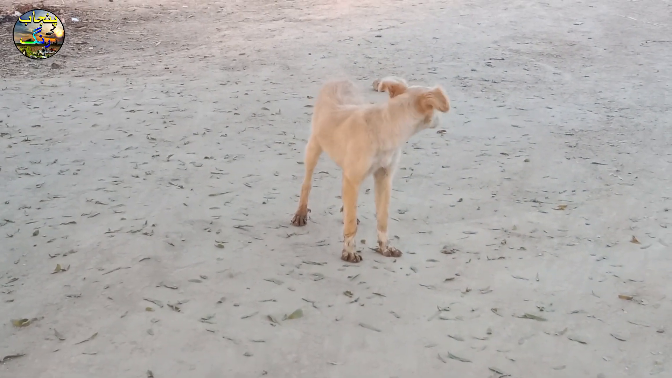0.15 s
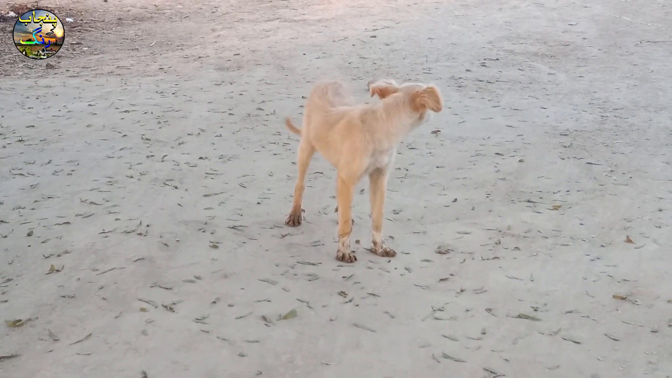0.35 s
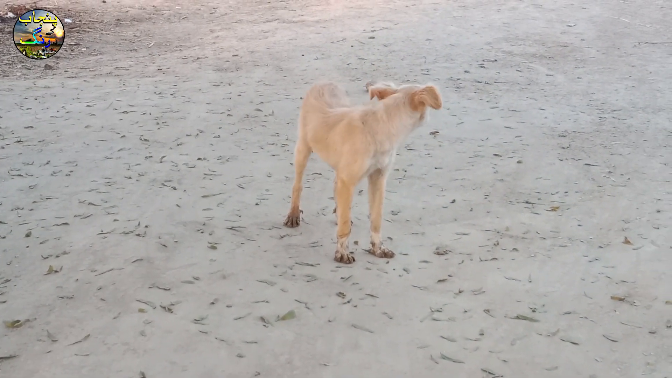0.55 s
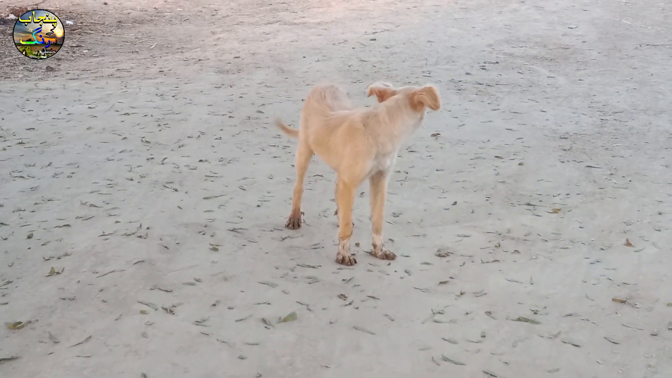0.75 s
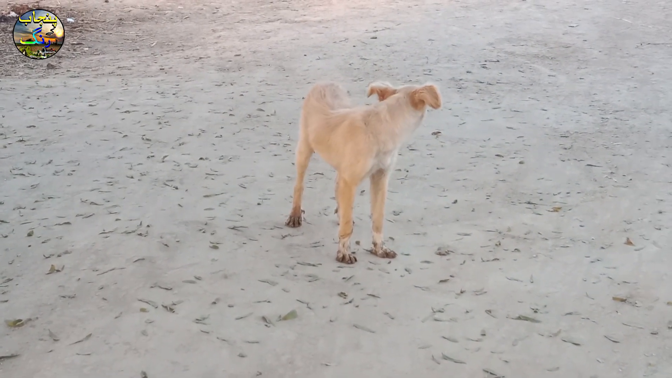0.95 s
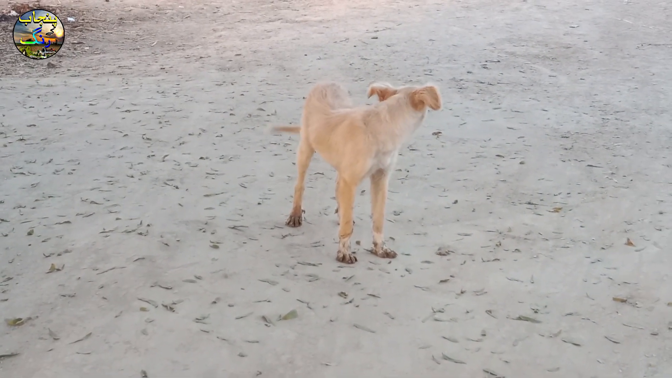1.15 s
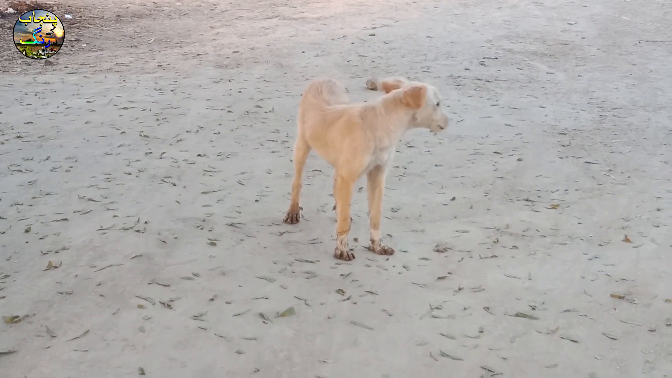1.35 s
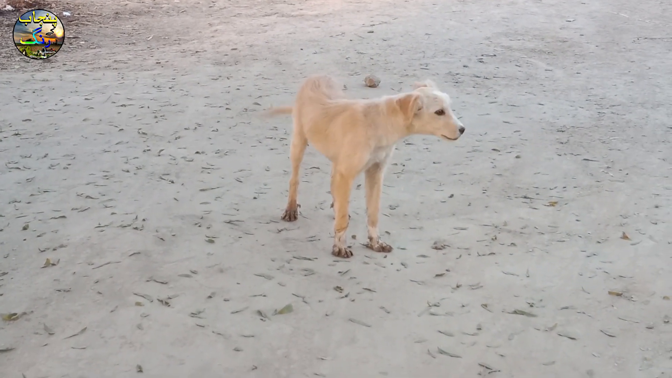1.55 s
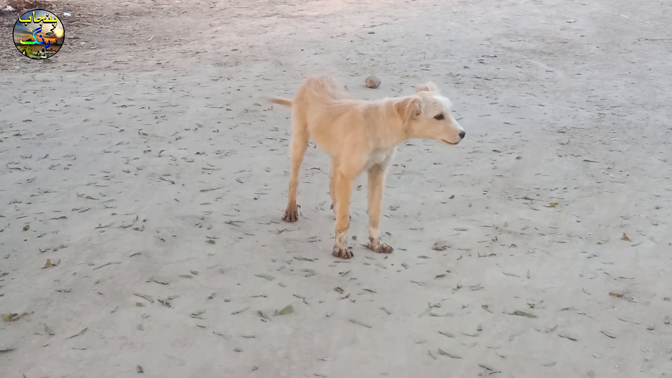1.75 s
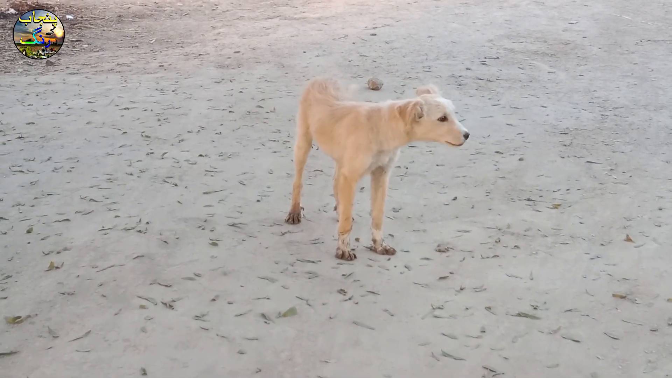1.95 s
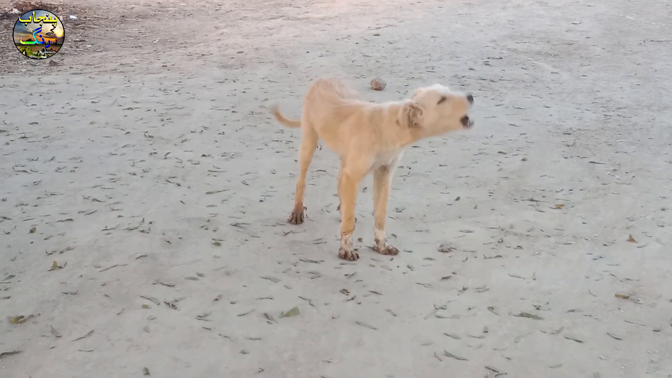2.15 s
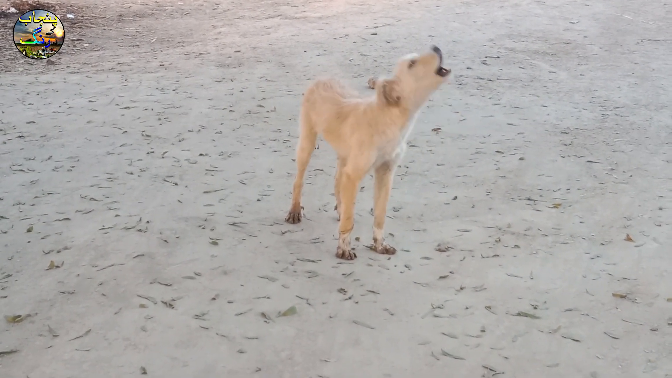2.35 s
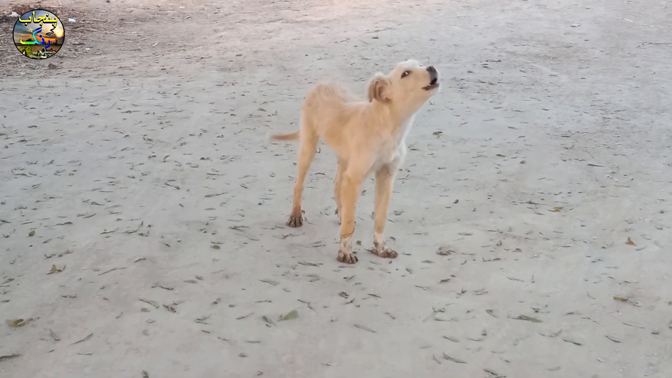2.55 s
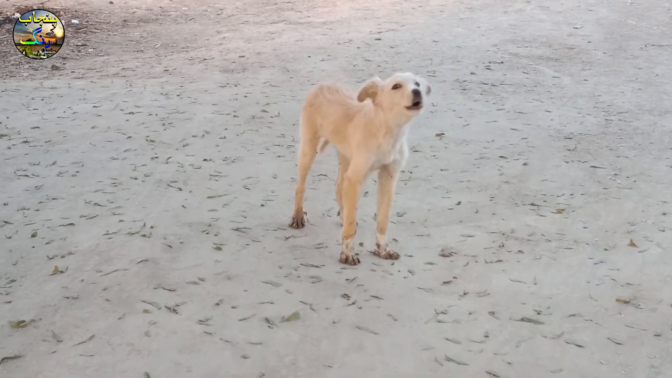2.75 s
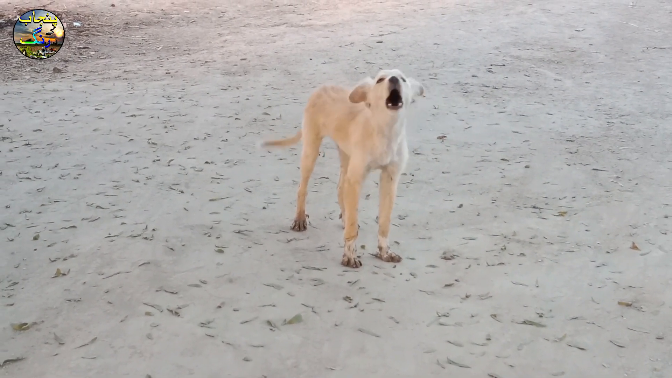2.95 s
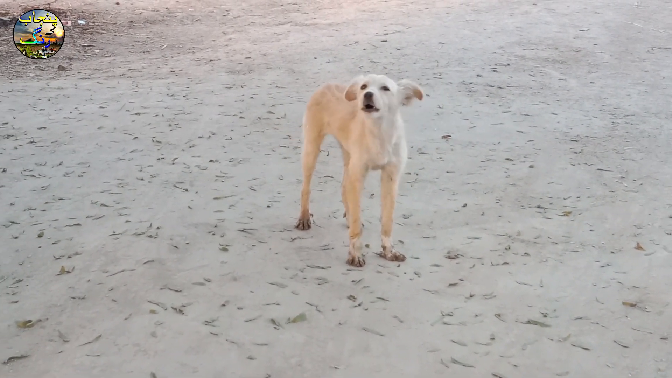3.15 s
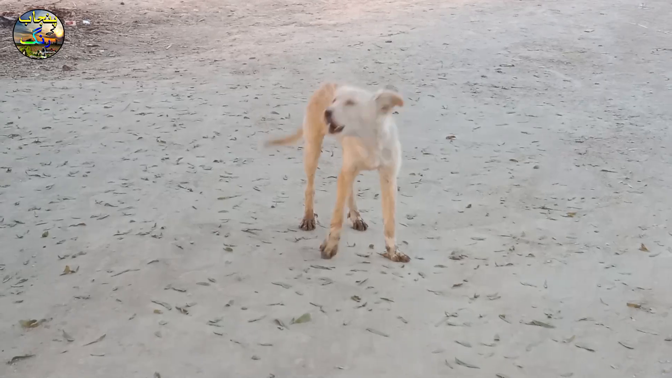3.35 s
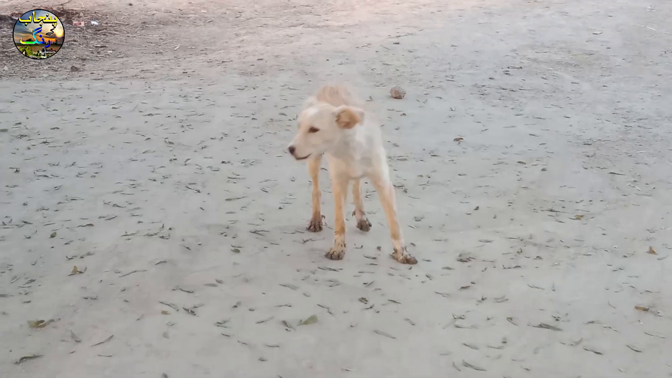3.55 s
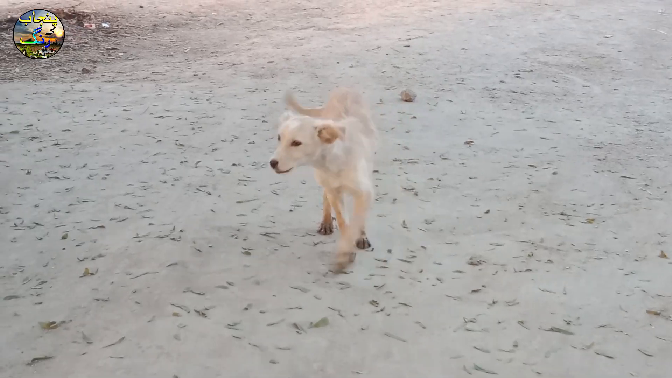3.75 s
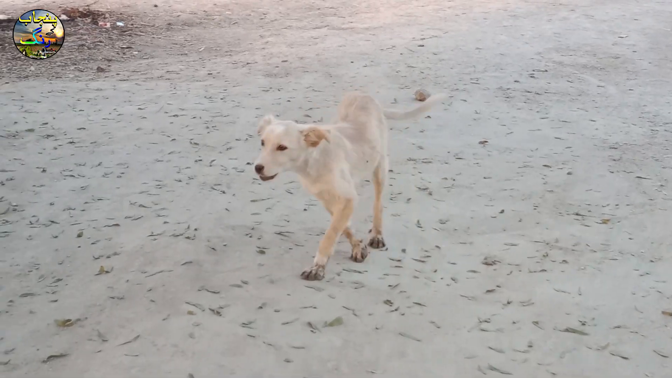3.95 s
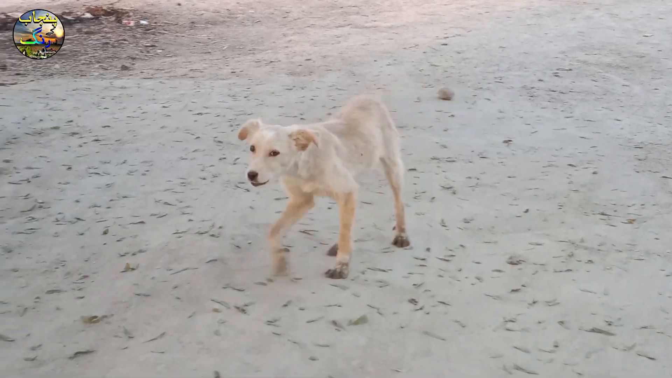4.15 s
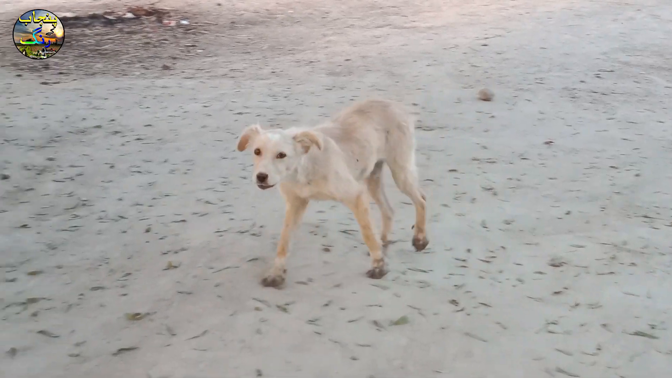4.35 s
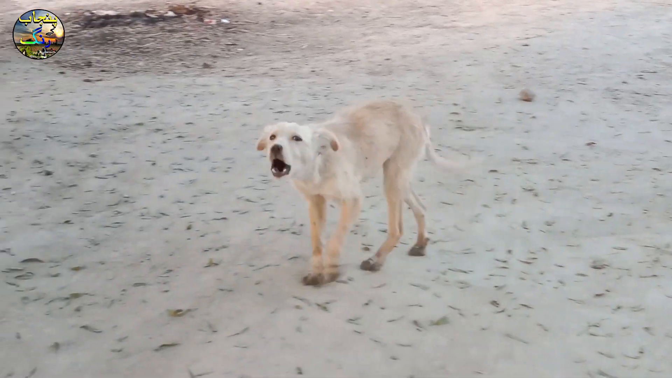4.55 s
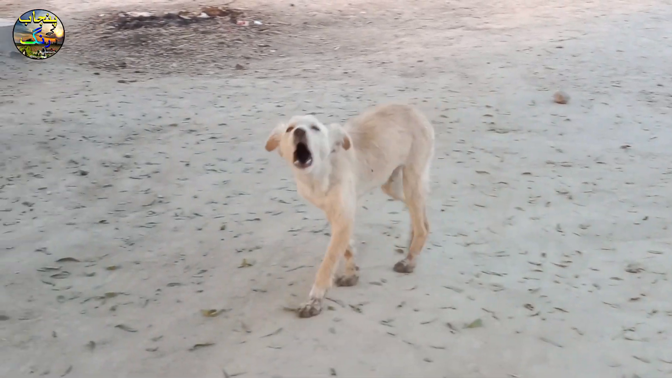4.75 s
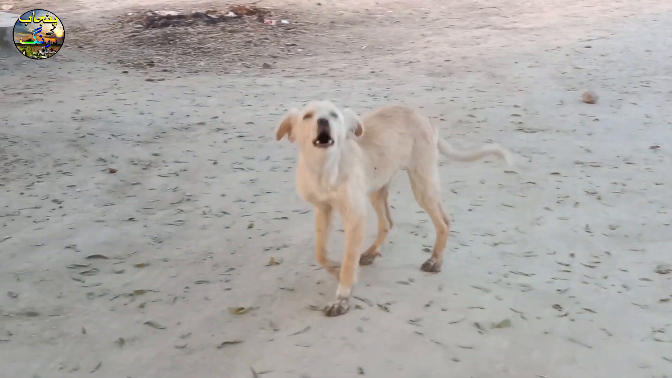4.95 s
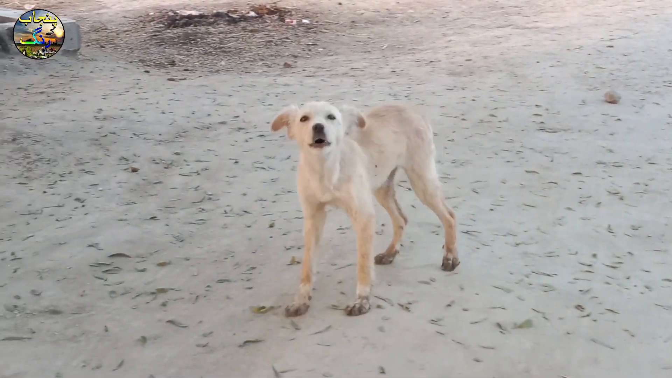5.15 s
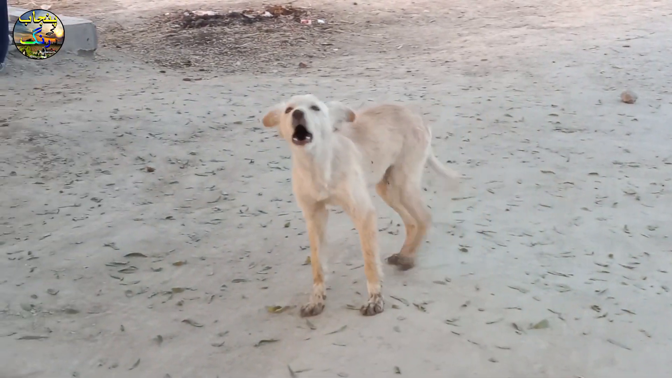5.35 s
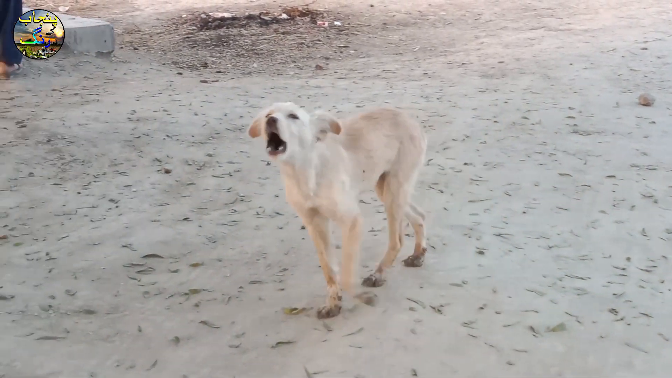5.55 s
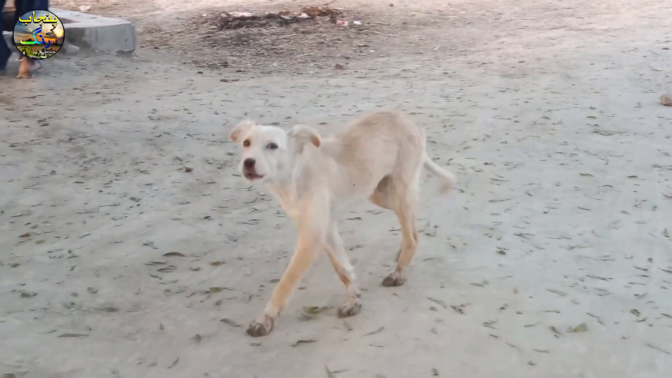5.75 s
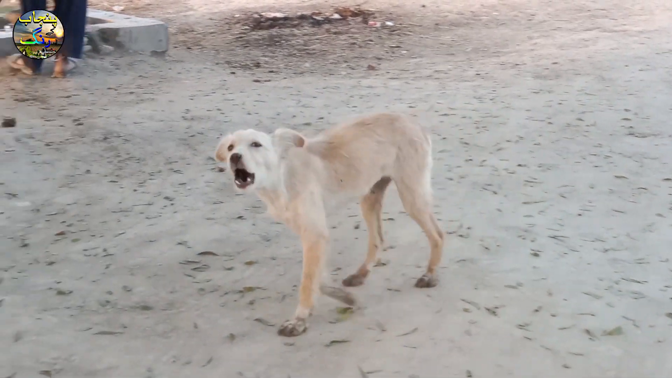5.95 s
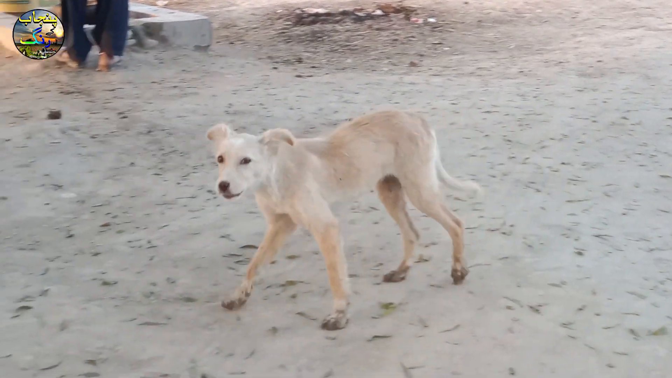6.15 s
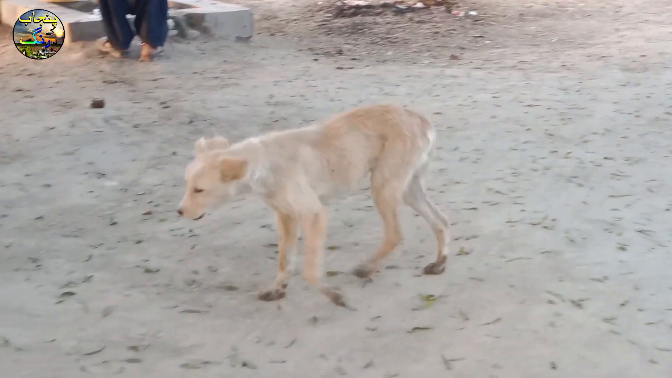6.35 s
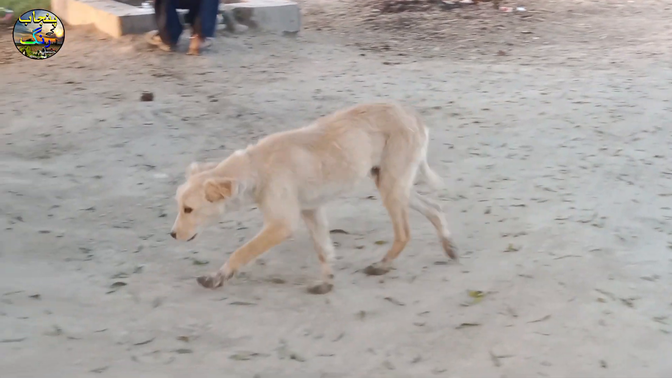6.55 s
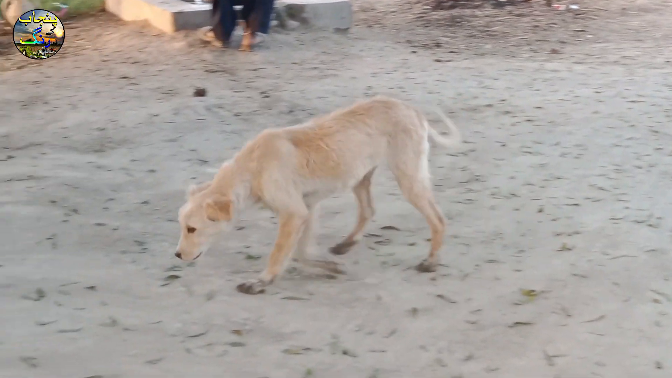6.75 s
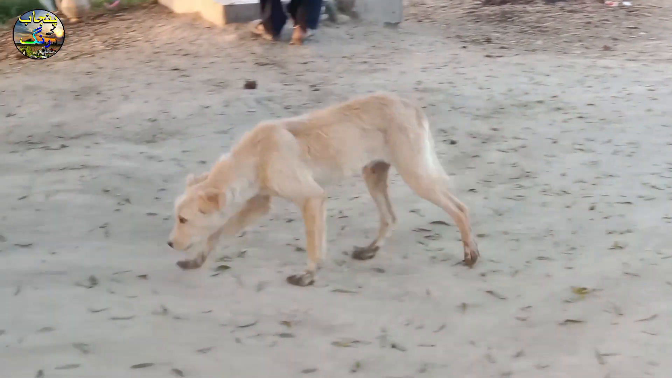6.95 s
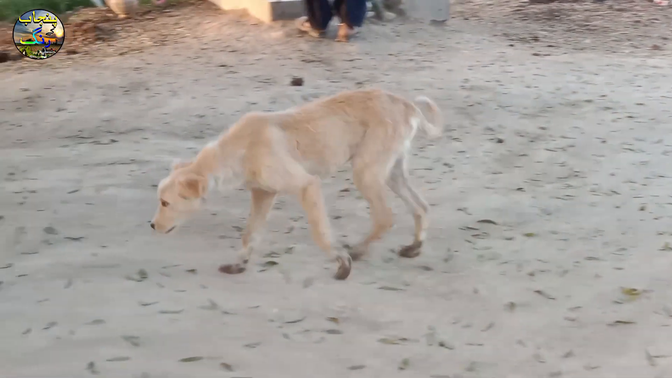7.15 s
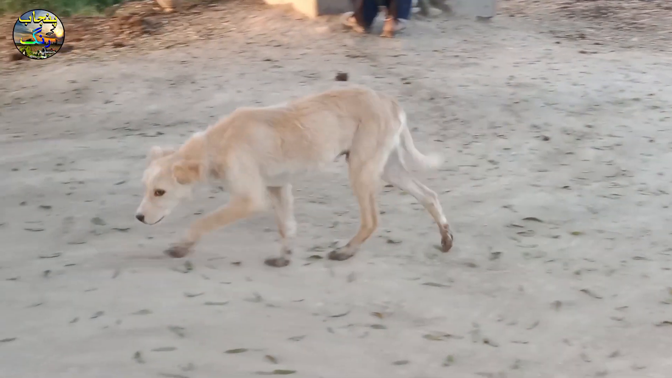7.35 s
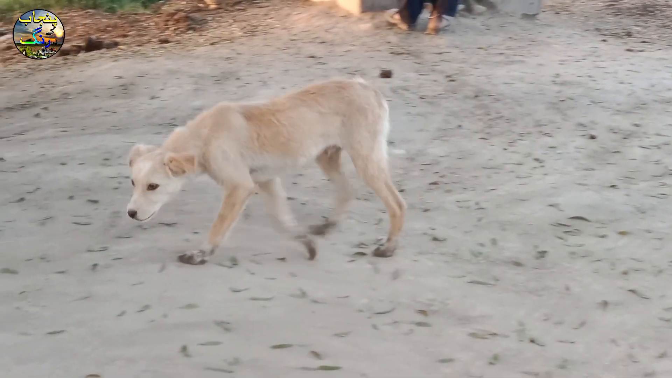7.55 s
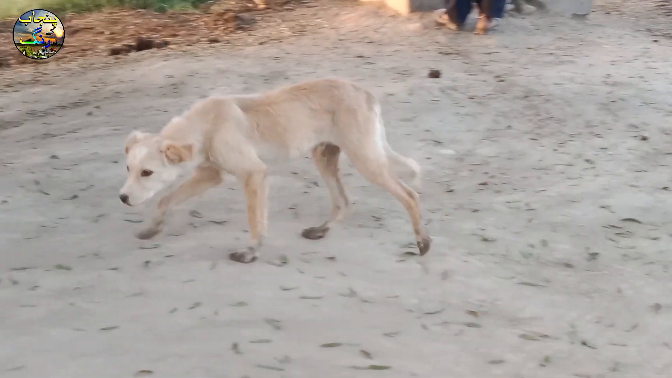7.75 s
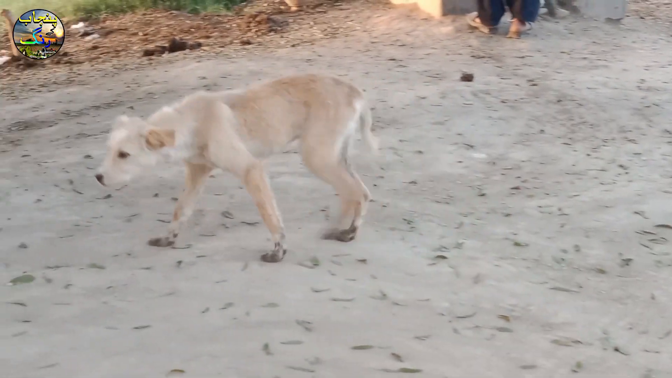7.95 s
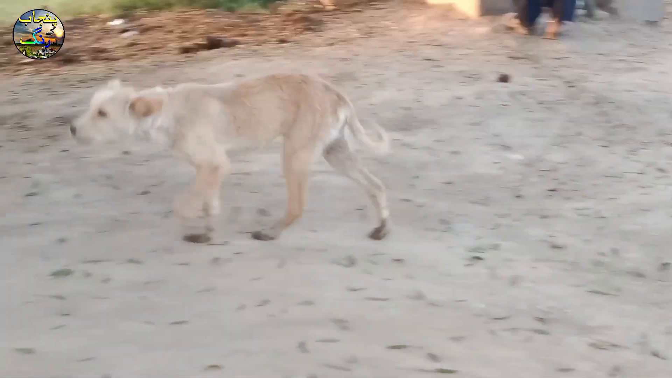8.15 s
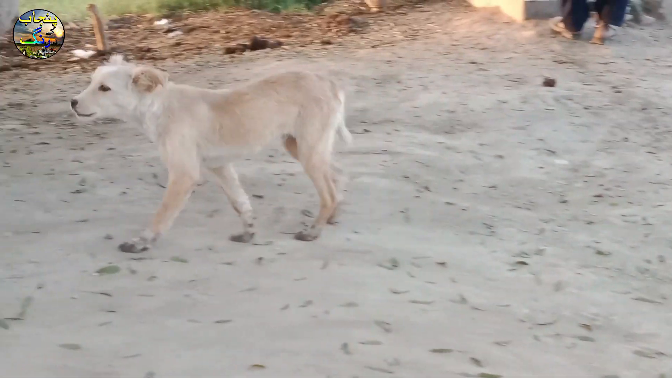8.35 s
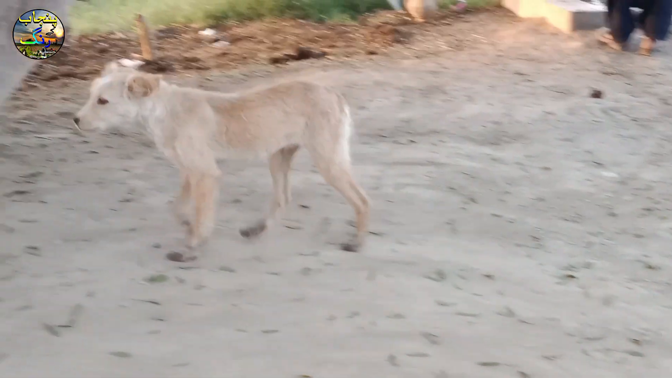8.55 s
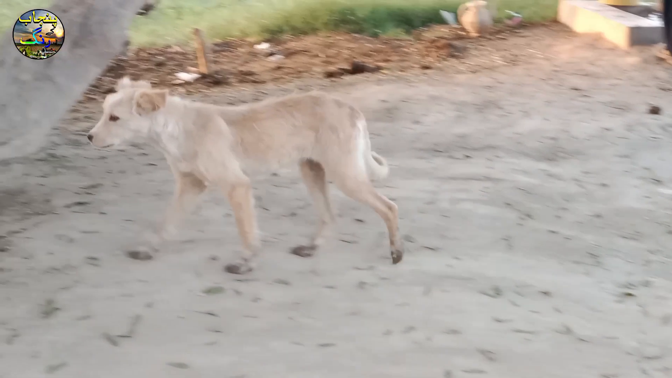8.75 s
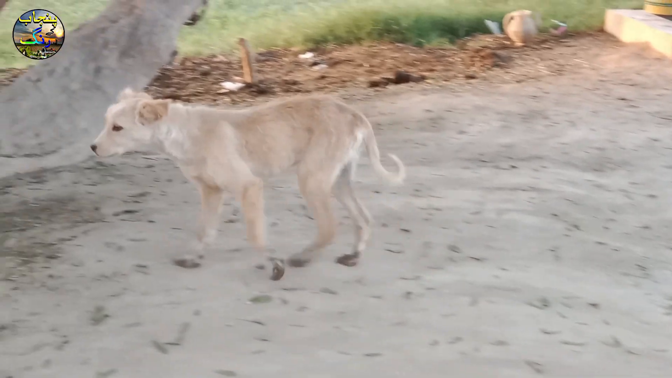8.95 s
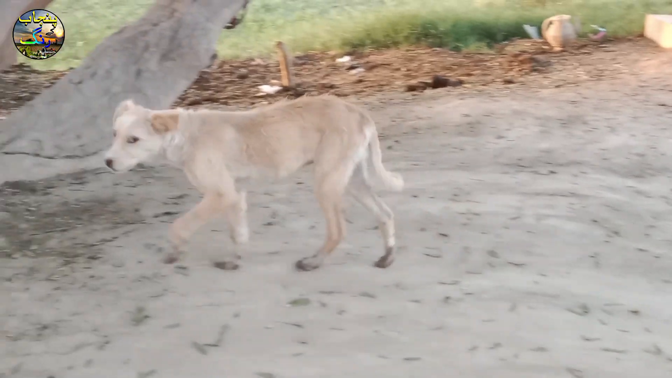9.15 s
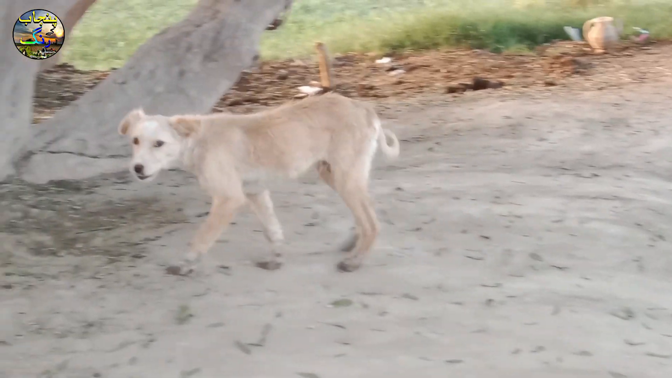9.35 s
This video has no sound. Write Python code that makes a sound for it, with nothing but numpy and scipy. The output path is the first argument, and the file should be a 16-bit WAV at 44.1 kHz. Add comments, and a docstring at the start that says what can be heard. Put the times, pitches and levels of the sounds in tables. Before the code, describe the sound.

In a quiet, open yard, sparrows chirp faintly from start to end, and another bird gives a few clear whistles around 1 second. At 2 seconds a young dog, close and loud, yelps five times in a quick, connected run lasting until about 3.4 seconds. Each bark starts as a rough rumble, leaps to a clean, high, howl-like note and drops back into a snarl. After a short pause, six more barks follow from 4.4 to 6 seconds, ending in a brief, quiet growl. From 6 seconds paws scuff lightly on dry dirt now and then, and the other bird whistles twice around 7 seconds. A longer, soft, low growl runs from about 7.9 to 8.6 seconds. A few faint scuffs and dull footfalls come just after 9 seconds as the sparrows carry on. There is only a slight outdoor echo.

```python
"""In an open dirt yard, sparrows chirp with both sides of their voice box and another bird whistles.
At 2 s a young dog yelps five times, and from 4.4 s six more. In each bark its vocal folds flap in a
rough rumble, tighten into a clean high note and drop back. From 6 s feet scuff and thud on the dirt
now and then, and slow pulses in the dog's throat make a short growl, then a longer one near 8 s.
The sparrows chirp on to the end."""
import sys
import numpy as np
from scipy import signal
from scipy.fft import rfft, irfft, next_fast_len
from scipy.io import wavfile
from scipy.ndimage import uniform_filter1d, minimum_filter1d

SR = 44100
rng = np.random.default_rng(int(sys.argv[2]) if len(sys.argv) > 2 else 0)


def master(y):
    """Save y as 16-bit WAV."""
    cut = np.clip(np.atleast_2d(y).T, -1, 1)
    pcm = np.round(cut * 32767)  # scale
    wavfile.write(sys.argv[1], SR, pcm.astype(np.int16))


N = 413638
TIME = np.arange(N) / SR

# runs of barks, with no pause in the voice (start [s], end [s])
BARK_BOUTS = [(2.008, 3.4), (4.383, 6.02)]
# each bark and its high note (note start [s], note length [s], first pitch [Hz], last pitch [Hz],
# run-up [s], fall [s], level before the leap [dB], at note start [dB], at note end [dB],
# after the drop [dB], overtones [dB], treble [dB], hoarseness [0-1])
BARK_NOTES = [(2.086, .06, 1131, 1116, .13, 0.12, -20, -27.5, -19.5, -17, -14, -37, 0),
              (2.326, 0.07, 887.6, 925, 0.11, .16, -13.5, -11.5, -9.5, -18, -25, -43.5, 0.01),
              (2.582, 0.049, 936, 990.5, 0.11, 0.15, -10.5, -12, -13, -17.5, -21, -38.5, 0.05),
              (2.865, 0.044, 977, 1002, 0.096, 0.14, -10.5, -12.5, -13, -16, -17, -35, 0.04),
              (3.19, 0.056, 888.4, 1192, 0.12, 0.096, -11, -20.5, -18, -17, -14.5, -35, 0.18),
              (4.45, 0.073, 1092, 1054, 0.099, 0.12, -17, -21.5, -9, -16.5, -14.5, -31, 0),
              (4.693, 0.085, 882.7, 924.3, 0.13, 0.17, -14, -11.5, -9.5, -19, -25.5, -39, 0.05),
              (4.964, .05, 916, 925.3, 0.094, .16, -8, -14, -7.5, -16.5, -24, -38, .05),
              (5.239, 0.051, 944.4, 1004, 0.081, 0.13, -8.5, -16, -16, -12.5, -17, -34, 0.15),
              (5.507, 0.045, 922, 984.5, 0.1, 0.094, -8, -12.5, -12, -12, -15.5, -33.5, 0.2),
              (5.831, .051, 900, 1240, 0.094, 0.096, -9.5, -17.5, -24.5, -14.5, -14, -38.5, 0.01)]
# the harsh burst in a bout's first bark (middle [s], width [s], level [dB])
OPENING_BURSTS = [(2.062, 0.01, -20.5), (4.429, .011, -10)]
# how the throat and mouth shape a bark (frequency [Hz], gain [dB])
BARK_THROAT = [(280, -35), (420, -19.5), (630, 17), (790, 7), (980, 5), (1160, -2.5), (1340, -1),
               (1540, -18.5), (1820, -7), (2500, -27.5), (3000, -20.5), (3700, -33.5), (5000, -40.5),
               (6350, -28.5), (6800, -31.5), (7600, -22), (9200, -50), (15000, -49.5)]
# how much the voice breaks up (pitch [Hz], roughness [0-1])
ROUGHNESS_BY_PITCH = [(380, 0.8), (660, 0.7), (820, 0.4), (920, 0)]
# where the half-closed mouth rings between barks (frequency [Hz], gain [dB])
SNARL_RESONANCES = [(590, 18), (965, 13), (1760, -2.5), (3100, -24)]
# loudness over time, one list per growl (time [s], chest level [dB], mouth level [dB])
GROWL_LEVELS = [
    [(5.97, -56, -43), (6.06, -44.5, -44.5), (6.13, -67, -58)],
    [(7.9, -71, -92), (7.95, -52, -46.5), (8.01, -37.5, -59), (8.045, -38.5, -38), (8.14, -38, -41),
     (8.28, -42, -52.5), (8.42, -43.5, -57), (8.66, -69, -74)],
]
# how the throat shapes a growl (frequency [Hz], gain [dB])
GROWL_SPECTRUM = [(70, -31.5), (135, -3), (280, -6), (400, -20.5), (600, -3.5), (830, -23), (1080, -10.5),
                  (1650, -22.5), (3000, -17.5), (6000, -34.5), (10000, -51)]
# sparrow calls, before the arch shapes them (start [s], base length [s], base pitch [Hz], level [dB])
SPARROW_CHIRPS = [(0.029, 0.082, 5330, -45.5), (0.481, 0.079, 5130, -44), (0.933, 0.058, 5340, -45.5),
                  (1.026, 0.045, 3700, -51.5), (1.516, 0.035, 4780, -54), (1.829, 0.071, 4190, -46.5),
                  (2.206, 0.074, 5530, -45), (3.01, 0.081, 5180, -39.5), (3.426, 0.06, 4994, -46),
                  (3.518, 0.04, 3465, -48), (3.897, 0.077, 5370, -41), (5.371, 0.07, 5930, -44),
                  (5.916, 0.085, 4860, -41), (6.451, 0.049, 4850, -52), (6.534, 0.045, 3675, -51),
                  (7.047, 0.039, 4290, -43), (7.113, 0.039, 4170, -42), (7.51, 0.094, 5140, -44.5),
                  (8.01, 0.076, 3890, -44), (8.153, 0.048, 5960, -47.5), (8.36, 0.06, 6060, -43),
                  (8.413, 0.092, 5890, -45), (8.687, 0.039, 4680, -52.5), (8.894, 0.082, 4970, -45),
                  (9.274, 0.13, 3960, -54.5)]
# the rise and fall of a chirp (time [x length], pitch [x base pitch], gain [x])
CHIRP_ARCH = [(0, 0.55, 0.62), (0.147, 1, 1.5), (0.301, 0.89, 2.2), (0.797, .6, 2.2), (1.102, 0.56, 0.55)]
# the other bird's notes (start [s], length [s], first pitch [Hz], last pitch [Hz], level [dB])
BIRD_WHISTLES = [(0.166, 0.11, 3560, 4200, -57), (0.817, 0.16, 2906, 2970, -34.5),
                 (0.968, 0.19, 4220, 4230, -55.5), (1.123, 0.36, 3985, 3380, -60),
                 (1.28, 0.092, 3780, 2520, -33.5), (6.936, 0.11, 3147, 3325, -39),
                 (7.254, 0.086, 3713, 3634, -40.5)]
# feet sliding on dry ground (start [s], base length [s], level [dB])
FOOT_SCUFFS = [(6.045, 0.051, -43), (6.282, 0.057, -53.5), (6.447, 0.18, -57), (6.92, 0.31, -55),
               (9.133, 0.082, -52), (9.266, 0.16, -54.5)]
# the tone of sliding grit (frequency [Hz], gain [dB])
SCUFF_SPECTRUM = [(60, -32), (170, -8), (420, -15.5), (720, 1.5), (1500, -0.5), (3200, 1), (7600, -5),
                  (9200, -24), (15000, -25)]
# soft footfalls (start [s], level [dB])
FOOTFALLS = [(7.593, -53), (9.138, -43.5), (9.224, -54)]
# dry hiss of dirt and leaves, also used in the chirps (frequency [Hz], gain [dB])
HISS_SPECTRUM = [(60, -12), (170, 5), (400, -10), (750, -2), (3200, -4), (7600, -0.5), (9200, -37.5),
                 (15000, -20.5)]


def barks(begin, end, jitter=.045, waver=.0082, shake=.34, settle_s=.018, attack_s=.025, release_s=.008):
    """Vocal folds flap roughly at low pitch and settle into a clean note at the top of each bark."""
    at = np.flatnonzero((TIME >= begin) & (TIME <= end))
    t, n, multiples = TIME[at], len(at), np.arange(1, 21)
    pitch, core_db, edge_db, treble_db, hoarse, away_s = blend_barks(t)
    pitch = uniform_filter1d(pitch, size=300)   # the voice box cannot change pitch in an instant
    rough = np.maximum(np.interp(pitch, *np.transpose(ROUGHNESS_BY_PITCH)), hoarse)
    hold = np.exp(-1 / (settle_s * SR))
    rough = np.maximum(rough, signal.lfilter([1 - hold], [1, -hold], rough))   # roughness lingers
    phase = cycles(pitch * (1 + jitter * rough * drift(n, 180) + waver * drift(n, 79)))
    # at low pitch, a wide-open mouth boosts the tone an octave up
    opening = np.minimum(from_db(edge_db - core_db), .8)
    boost = 3.5 * opening ** 2 * np.interp(pitch, [750, 850], [1, 0])
    folds = overtones(phase, multiples) + boost * overtones(phase, [2])
    # strong and weak cycles take turns, adding tones halfway between the overtones
    halves = from_db(-8) * overtones(phase + .5 * drift(n, 90), multiples - .5)
    rasp = from_db(4) * rng.standard_normal(n) * (1 + .5 * np.cos(phase))   # air escapes once a cycle
    # three bands: the low core, the hoarser edge above it, and the treble
    core, _ = split(colour(folds + rough * (halves + rasp), BARK_THROAT), 1540)
    _, upper = split(colour(folds + (2.6 * rough + .12) * (halves + rasp), BARK_THROAT), 1518)
    edge, treble = split(upper, 3900)
    voice = from_db(core_db) * even(core) + from_db(edge_db) * even(edge)
    voice += from_db(treble_db) * even(treble)
    burst = sum(from_db(db) * np.exp(-((t - s) / width) ** 2) for s, width, db in OPENING_BURSTS)
    voice += burst * (overtones(phase, [2]) + .5 * even(edge))
    voiced = np.exp(-(away_s / .06) ** 2)   # away from the note, a snarl takes over
    voice = (.3 + .7 * voiced) * voice + np.sqrt(1 - voiced ** 2) * from_db(core_db) * snarl(n)
    # slack folds let the chest rumble between barks, and hum an octave under the voice
    chest = from_db(-55) * rumble(n)[0] + from_db(-42) * np.sin(phase / 2)
    slack = np.interp(pitch, [300, 650], [1, 0]) ** 2
    fade = np.interp(t, [begin, begin + attack_s, end - release_s, end], [0, 1, 1, 0]) ** 2
    out = np.zeros(N)
    out[at] = fade * (voice * (1 + shake * rough * drift(n, 55.5)) + slack * chest)
    return out


def bark_shape(t, row, leap_s=.013, leap_ratio=1.4, drop_s=.025, drop_hz=666.6, slack_hz=206.3):
    """Pitch and level curves of one bark: the folds tighten, leap to a note, drop back and slacken."""
    start, length, first_hz, last_hz, rise_s, fall_s, *levels_db, edge_db, treble_db, hoarse = row
    end = start + length
    turns = [start - leap_s, start, end, end + drop_s]
    slack = np.maximum(turns[0] - t, 0) / rise_s + np.maximum(t - turns[-1], 0) / fall_s
    bow = np.sin(np.pi * np.clip((t - start) / length, 0, 1))   # lifts pitch and level mid-note
    lead_hz = min(first_hz / leap_ratio, drop_hz * 1.2)
    taut_hz = np.interp(t, turns, [lead_hz, first_hz, last_hz, drop_hz]) * (1 + .012 * bow)
    pitch = slack_hz + (taut_hz - slack_hz) * np.exp(-1.25 * slack)
    core_db = np.interp(t, turns, levels_db) + 4 * bow - 23 * slack
    bright_db = np.interp(t, turns, [-2.5, 0, -9, -4.5])   # the note grows purer as it goes
    edge_db = edge_db + bright_db - 27.5 * slack
    treble_db = treble_db + bright_db - 24.5 * slack
    away_s = np.abs(t - np.clip(t, turns[0], turns[-1]))
    return pitch, core_db, edge_db, treble_db, np.full(len(t), hoarse), away_s


def blend_barks(t):
    """Barks run into each other: the stronger one takes over the voice."""
    shapes = np.array([bark_shape(t, row) for row in BARK_NOTES if t[0] < row[0] < t[-1]])
    weight = from_db(shapes[:, 1:2]) ** 4   # from each bark's core level
    return (weight * shapes).sum(axis=0) / weight.sum(axis=0)


def overtones(phase, multiples, flutter=.08):
    """The folds make tones at multiples of their pitch; the higher ones flutter more."""
    return sum(np.cos(k * phase + k * k + flutter * (k - 1) * drift(len(phase), 140)) for k in multiples)


def snarl(n, flap_hz=141, sharpness=13):
    """Slack folds let through uneven puffs of air that make the mouth ring."""
    puffs = rng.standard_normal(n) * (1 + np.cos(cycles(flap_hz * (1 + .12 * drift(n, 60)))))
    ringing = sum((-1) ** k * from_db(db) * signal.lfilter(*signal.iirpeak(hz, sharpness, SR), puffs)
                  for k, (hz, db) in enumerate(SNARL_RESONANCES))
    return even(split(ringing, 3800)[0])


def growl(rows):
    """The chest hums, and a higher rasp gets out when the lips part."""
    at, (chest_db, mouth_db) = curves(rows)
    chest, mouth = rumble(len(at))
    out = np.zeros(N)
    out[at] = from_db(chest_db) * chest + from_db(mouth_db) * mouth
    return out


def rumble(n, pitch_hz=141, rasp=36, shake=.43):
    """Slow, uneven pulses in the throat give two sounds: a chest hum and a mouth rasp."""
    phase = cycles(pitch_hz * (1 + .07 * drift(n, 25)))
    pulses = sum(np.cos(k * phase) for k in range(1, 30)) * (1 + shake * drift(n, 57))
    air = rasp * rng.standard_normal(n) * (1 + np.cos(phase))
    chest, _ = split(colour(pulses + air / 4, GROWL_SPECTRUM), 400)
    _, mouth = split(colour(pulses + air, GROWL_SPECTRUM), 490)
    return rms_one(chest), rms_one(mouth)


def sparrows(warble=.099, octave_db=-30, hiss_db=-22, lag=.43, floor_hz=2400):
    """The two sides of a bird's voice box each sing an arch, one later and lower than the other."""
    out = np.zeros(N)
    for start, length, base_hz, level_db in SPARROW_CHIRPS:
        for begin, hz in ((start, base_hz), (start + lag * length, .92 * base_hz)):
            arch = np.array(CHIRP_ARCH) ** [rng.uniform(.63, 1.3), 1, 1]   # vary the timing
            at, (pitch, gain) = curves(arch * [.89 * length, hz, 1] + [begin, 0, 0])
            n = len(at)
            pitch = 500 * np.logaddexp(pitch / 500, floor_hz / 500)   # the fall flattens near the floor
            phase = cycles(pitch * (1 + warble * drift(n, 380)))
            _, hiss = split(from_db(hiss_db) * dry_hiss(n), 670)
            tone = np.sin(phase) + from_db(octave_db) * np.sin(2 * phase) + hiss
            out[at] += from_db(level_db) * gain * tone * (1 + .5 * drift(n, 130))
    return out


def whistles(waver=.0071, bend=1.6):
    """A bird's nearly pure notes swell and fade, gliding slowly at first and then faster."""
    out = np.zeros(N)
    for start, length, first_hz, last_hz, level_db in BIRD_WHISTLES:
        at, (progress,) = curves([(start, 0), (start + length, 1)])
        pitch = first_hz + (last_hz - first_hz) * progress ** bend
        phase = cycles(pitch * (1 + waver * drift(len(at), 180)))
        out[at] += from_db(level_db) * np.sqrt(2) * np.sin(phase) * np.hanning(len(at))
    return out


def scuffs(grain_db=3, rise=.26, linger=2):
    """Grit slides under a foot: a quick rise, then a grainy slide that fades."""
    push = sum(from_db(db) * np.interp(TIME, [s, s + rise * length, s + linger * length], [0, 1, 0])
               for s, length, db in FOOT_SCUFFS)
    grains = rng.standard_normal(N) * from_db(grain_db * drift(N, 210))
    return push * rms_one(colour(grains, SCUFF_SPECTRUM))


def steps(thud_hz=182, rise_s=.011, waver=.049):
    """A foot lands on packed earth: a dull thud that swells and dies at once."""
    out = np.zeros(N)
    for start, level_db in FOOTFALLS:
        at = np.flatnonzero((TIME >= start) & (TIME < start + 10 * rise_s))
        age = (TIME[at] - start) / rise_s
        thud = np.sin(cycles(thud_hz * (1 + waver * drift(len(at), 150))))
        out[at] += from_db(level_db) * age * np.exp(1 - age) * thud
    return out


def yard_echoes(x, first_s=.0014, decay_s=.32):
    """Sound bounces off walls and trees, fading by 60 dB in decay_s."""
    t = TIME[:SR // 2]
    echoes = rng.standard_normal(len(t)) * (t > first_s) * from_db(-60 * t / decay_s)
    return signal.fftconvolve(x, echoes / np.linalg.norm(echoes))[:N]


def dry_hiss(n):
    """Steady noise with the tone of rustling dirt and leaves."""
    return rms_one(colour(rng.standard_normal(n), HISS_SPECTRUM))


def from_db(db):
    """Turn decibels into a gain."""
    return 10 ** (np.asarray(db) / 20)


def rms_one(x):
    """Scale a sound to an average level (rms) of 1."""
    return x / np.sqrt(np.mean(x ** 2))


def even(x, size=300):
    """Hold a sound's level near 1 the whole way through."""
    return x / np.sqrt(np.abs(uniform_filter1d(uniform_filter1d(x * x, size), size)) + 1e-12)


def curves(rows):
    """The samples that a table spans, and its columns joined by straight lines."""
    times, *columns = np.transpose(rows)
    at = np.flatnonzero((TIME >= times.min()) & (TIME <= times.max()))
    return at, [np.interp(TIME[at], times, column) for column in columns]


def colour(x, points):
    """Shape a sound's tone with (frequency [Hz], gain [dB]) points."""
    hz, db = np.transpose(points)
    size = next_fast_len(len(x) + SR // 20)
    bins = np.maximum(np.fft.rfftfreq(size, 1 / SR), 1)
    gain = from_db(np.interp(np.log(bins), np.log(hz), db))
    return irfft(rfft(x, size) * gain, size)[:len(x)]


def split(x, hz):
    """The parts below and above a frequency."""
    low = signal.sosfiltfilt(signal.butter(4, hz, fs=SR, output="sos"), x)
    return low, x - low


def drift(n, rate_hz):
    """A random wobble of typical size 1, mostly slower than rate_hz."""
    sos = signal.butter(2, rate_hz, fs=SR, output="sos")
    return rms_one(signal.sosfilt(sos, rng.standard_normal(n + SR // 10))[-n:])


def cycles(pitch):
    """How far a vibration has turned (its phase, in radians) as its pitch moves."""
    return 2 * np.pi * np.cumsum(pitch) / SR


def suppress(x, threshold_db=-86, depth_db=-14, size=1024):
    """Whatever is faint in its frequency band is turned down further."""
    _, _, bands = signal.stft(x, nperseg=size)
    power = uniform_filter1d(np.abs(bands) ** 2, size=7, axis=-2)
    gain = np.maximum(power / (np.abs(power) + from_db(threshold_db) ** 2), from_db(depth_db))
    return signal.istft(bands * gain, nperseg=size)[1][..., :N]


def limit(x, peak=.85, size=200):
    """The volume dips just ahead of any peak that would be too loud."""
    gain = minimum_filter1d(np.minimum(1, peak / (np.abs(x) + 1e-9)), size)
    return x * uniform_filter1d(gain, size)


def scene(echo_db=-16, rustle_db=-72):
    """The dog, the birds and their echoes over the yard's faint rustle, in one channel."""
    dog = sum(barks(*bout) for bout in BARK_BOUTS) + sum(map(growl, GROWL_LEVELS)) + scuffs() + steps()
    birds = sparrows() + whistles()
    rustle = from_db(rustle_db) * dry_hiss(N)
    return (dog + birds + yard_echoes(from_db(echo_db) * (dog + birds)) + rustle)[None]


def record(dry, bass_hz=70, top_hz=16000):
    """The microphone loses deep bass; faint noise and peaks are turned down, and the top is cut."""
    thin = signal.sosfilt(signal.butter(2, bass_hz, "high", fs=SR, output="sos"), dry)
    return signal.sosfilt(signal.cheby2(16, 70, top_hz, fs=SR, output="sos"), limit(suppress(thin)))


dry = scene()
out = record(dry)
master(out)
```